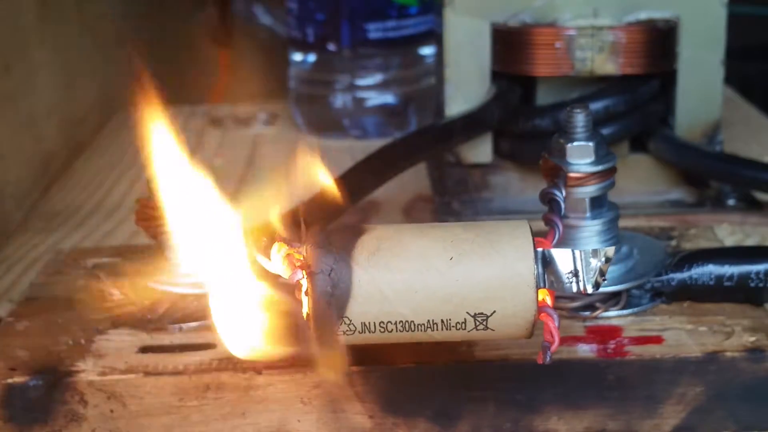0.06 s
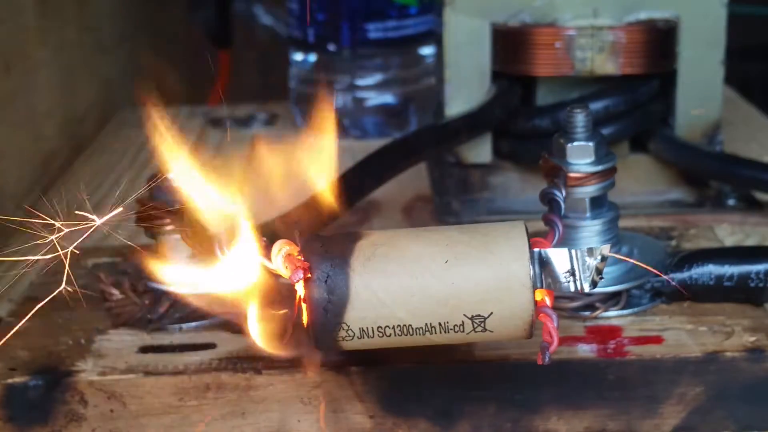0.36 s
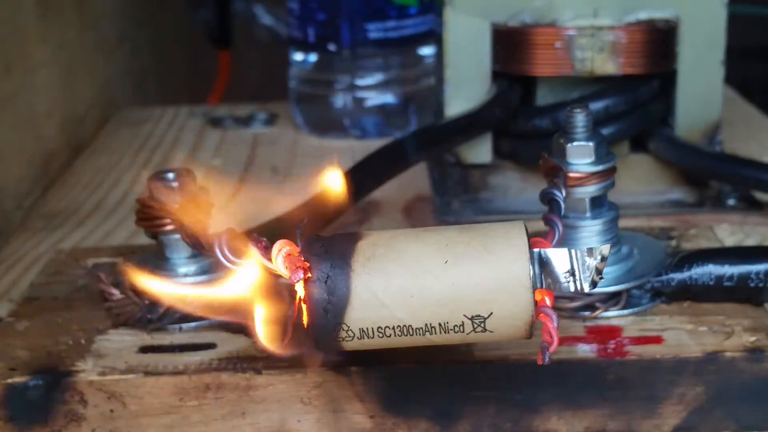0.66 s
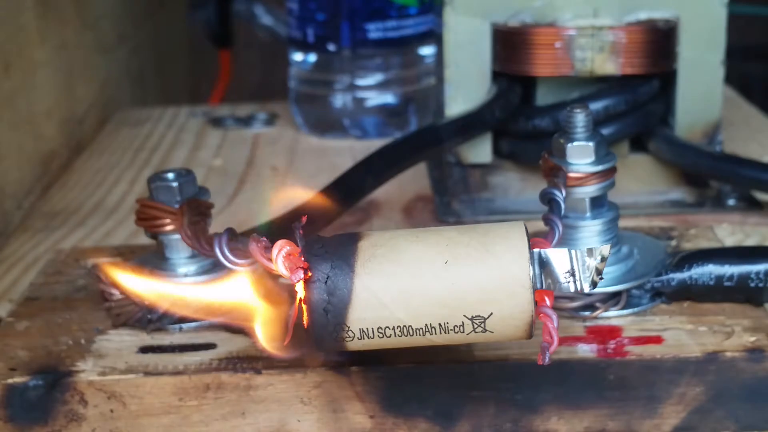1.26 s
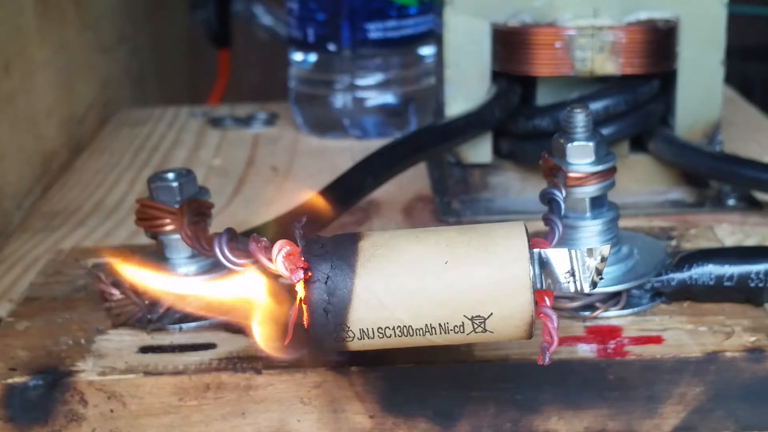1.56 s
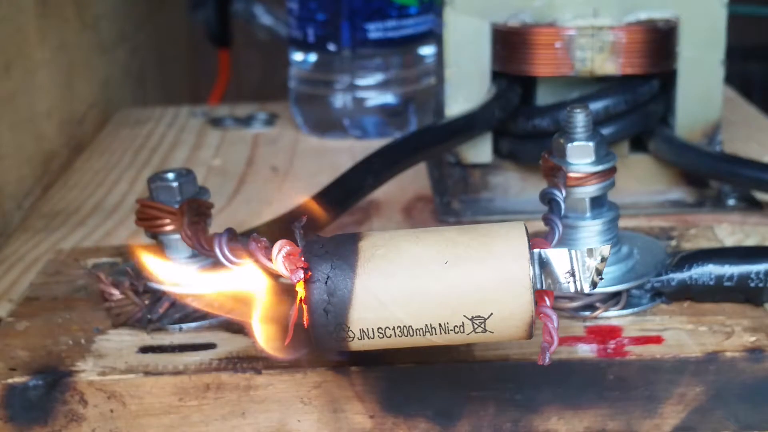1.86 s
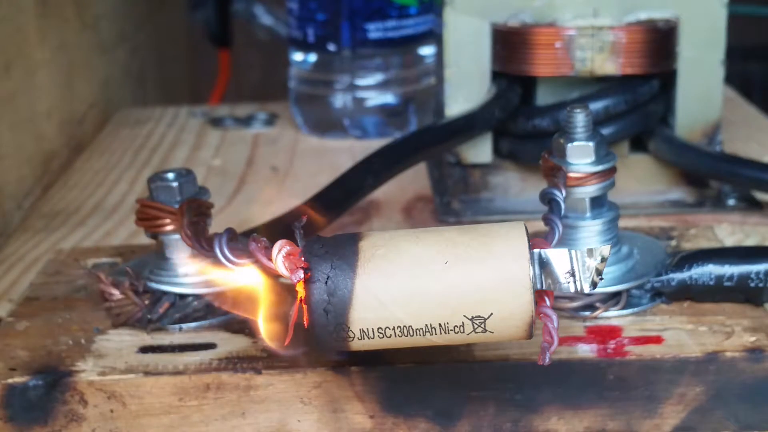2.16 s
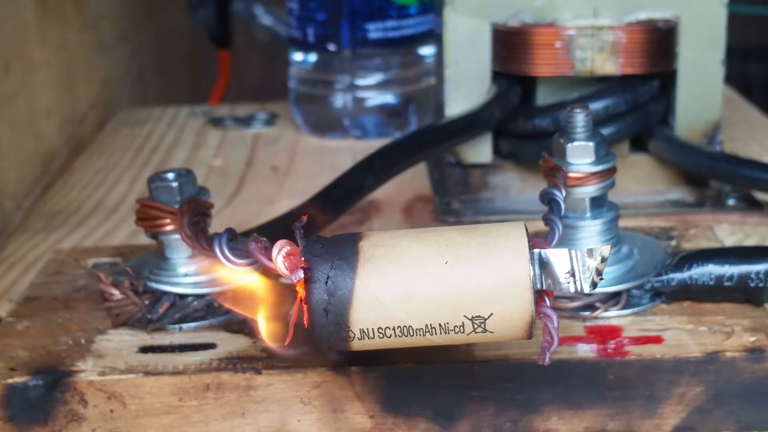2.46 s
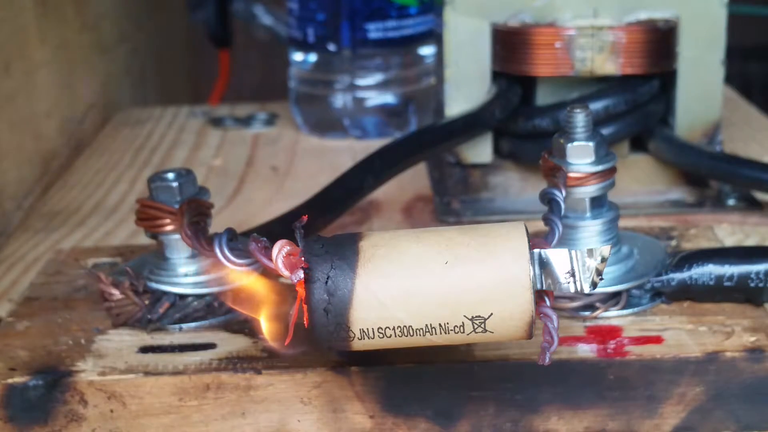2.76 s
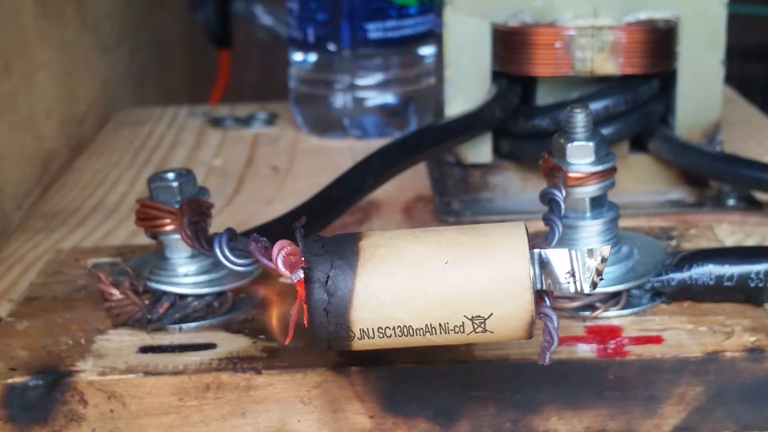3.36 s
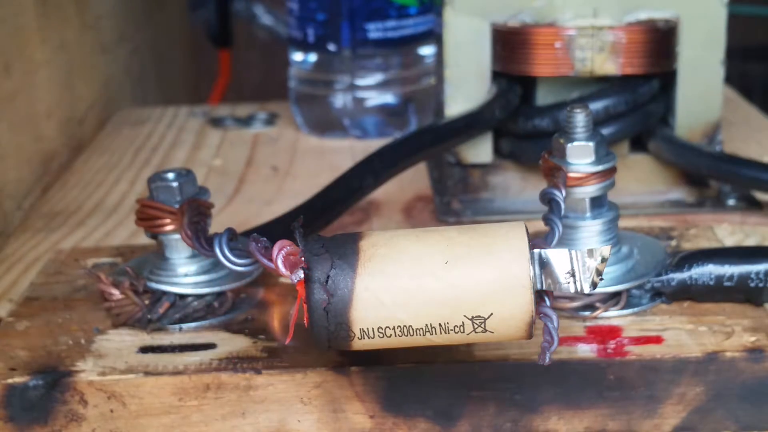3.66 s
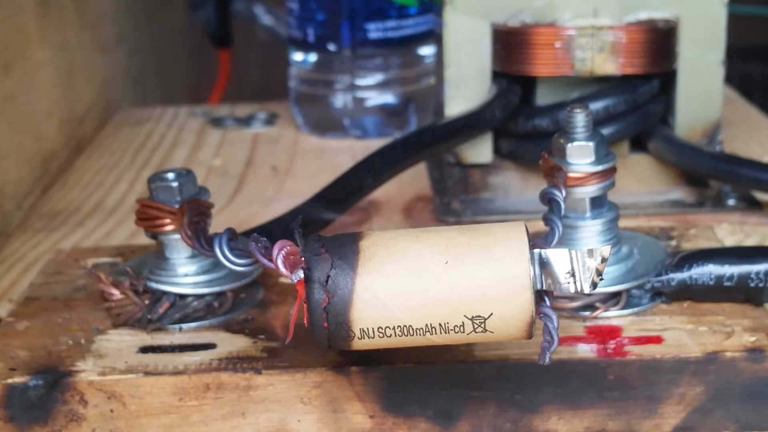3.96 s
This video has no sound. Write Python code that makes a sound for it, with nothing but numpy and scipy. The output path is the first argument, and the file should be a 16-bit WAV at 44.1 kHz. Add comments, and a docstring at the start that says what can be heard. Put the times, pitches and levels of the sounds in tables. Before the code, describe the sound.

A battery vents burning gas close by with a hissing, roaring rush and a quick burst of sharp spark pops. The hiss weakens and ends in thin, broken whistles while a power supply hums and buzzes behind it.

```python
"""Battery cell venting on a bench

A stereo pair stands close to an overcharged cell on a wooden bench. Burning gas escapes: a hissing
jet, a roaring flame, a burst of spark pops. The flame shrinks and the vent ends in thin whistles.
Behind it the power supply hums, buzzes and runs its fan. The whole level sinks around the pops,
stays low for about a second and swells back."""
import sys
import numpy as np
from scipy import signal
from scipy.fft import rfft, irfft
from scipy.io import wavfile
from scipy.ndimage import uniform_filter1d

SR = 44100
rng = np.random.default_rng(int(sys.argv[2]) if len(sys.argv) > 2 else 0)


def master(y):
    """Save y as 16-bit WAV."""
    cut = np.clip(np.atleast_2d(y).T, -1, 1)
    pcm = np.round(cut * 32767)  # scale
    wavfile.write(sys.argv[1], SR, pcm.astype(np.int16))


N = 176400
T = np.arange(N) / SR
FREQS = np.fft.rfftfreq(N, 1 / SR)
BAND_LIMIT_HZ = 15850


def amp(db):
    """Decibels to gain."""
    return 10 ** (np.asarray(db) / 20)


def unit(x):
    """Scales to rms 1."""
    return x / np.sqrt(np.mean(x ** 2) + 1e-20)


def curve(rows, column=1):
    """One column of a time table at every sample."""
    rows = np.array(rows)
    return np.interp(T, rows[:, 0], rows[:, column])


def at_hz(rows, hz, column=1):
    """One column of a spectrum table, interpolated over log frequency."""
    rows = np.array(rows)
    return np.interp(np.log(hz + 1), np.log(rows[:, 0] + 1), rows[:, column])


def pan(db):
    """Gains of constant total power, the left microphone db above the right."""
    return unit(amp(np.array([[db], [-db]]) / 2))


def wander(hz):
    """Random drift of rms 1, mostly slower than hz."""
    return unit(irfft(rfft(rng.standard_normal(N)) / (1 + (FREQS / hz) ** 2), N))


# likeness of the two microphones: f/Hz, correlation (clipped to +-1 in use)
PAIR_LIKENESS = [(70, 0.82), (300, 1.1), (650, 0.33), (1300, -0.03), (3000, 0.23), (8000, -0.55),
                 (15000, 1.2)]
# balance across the pair: f/Hz, left minus right/dB
PAIR_BALANCE = [(70, -2.5), (200, 2.5), (650, 5.5), (1300, 2.5), (15000, 6)]
def air_noise(spectrum, left_lead_s=0.000232):
    """Coloured noise at the pair: nearly mono in the bass, reaching the left microphone first."""
    shared, apart = rfft(rng.standard_normal((2, N)))
    likeness = np.clip(at_hz(PAIR_LIKENESS, FREQS), -1, 1)
    balance = amp(at_hz(PAIR_BALANCE, FREQS))
    left = shared * balance * np.exp(2j * np.pi * FREQS * left_lead_s)
    right = likeness * shared + np.sqrt(1 - likeness ** 2) * apart
    pair = np.array([left, right]) / np.sqrt(1 + balance ** 2)
    return irfft(pair * amp(at_hz(spectrum, FREQS)), N) * np.sqrt(SR)


def ring(x, colour, size=4096):
    """Rings x through a minimum-phase filter of unit energy with the given colour."""
    log_gain = np.log(amp(at_hz(colour, abs(np.fft.fftfreq(size, 1 / SR)))))
    taps = np.fft.ifft(np.exp(np.conj(signal.hilbert(log_gain)))).real[:size // 2]
    return signal.oaconvolve(x, taps[None] / np.linalg.norm(taps), axes=1)[:, :N]


# rush of the fan behind the cell: f/Hz, level/dB
FAN_AIR = [(18, -78), (35, -62), (48, -78.5), (75, -61.5), (105, -66.5), (150, -67.5), (260, -71),
           (650, -74.5), (1050, -77.5), (1600, -83.5), (2700, -86), (4500, -91), (6300, -99.5),
           (7600, -89.5), (9000, -87.5), (13000, -105), (16000, -111)]
# its drones, centred in the pair: f/Hz, waver rate/Hz, level/dB
FAN_DRONES = [(66.16, 3.7, -40.5), (84.1, 9.6, -46.5), (117, 2.8, -47)]
def fan(waver_db=1.5, drift_rad=0.79):
    """The supply's fan pushes air and adds a few unsteady low drones."""
    out = air_noise(FAN_AIR)
    for hz, waver_hz, db in FAN_DRONES:
        phase = 2 * np.pi * hz * T + drift_rad * wander(waver_hz)
        out += amp(db) * unit(np.sin(phase) * amp(waver_db * wander(waver_hz)))
    return out


PULSE_HZ = 120.009  # current pulses in the supply, two per mains cycle
# mains hum, mostly to the left: multiple of the pulse rate, level/dB, left minus right/dB
HUM_HARMONICS = [(1, -47.5, 3.5), (2, -47.5, 5.5), (4, -51, 6), (5, -57, -3), (6, -52.5, 9), (9, -51, 6.5),
                 (10, -58, 32), (11, -62.5, -30), (15, -67.5, 5), (17, -67.5, 5)]
def hum(waver_db=1, waver_hz=18):
    """The transformer hums on multiples of the current's pulse rate."""
    out = np.zeros((2, N))
    for harmonic, db, pan_db in HUM_HARMONICS:
        tone = np.sin(2 * np.pi * (harmonic * PULSE_HZ * T + rng.random()))
        out += amp(db) * unit(tone * amp(waver_db * wander(waver_hz))) * pan(pan_db)
    return out


# resonances of the buzzing supply: f/Hz, level/dB
BUZZ_COLOUR = [(1500, -29), (3200, -19.5), (3480, -5), (3840, 0.5), (4080, -4), (4350, -11), (4700, 2.5),
               (5150, -20), (5550, -1), (6400, -10), (7800, -13), (9050, -5.5), (9500, -3), (10900, -5),
               (11500, 5), (12200, -1.5), (13200, 5.5), (14500, -11.5), (15800, -7.5)]
# each tick reflected off the bench: delay/s, level/dB
BENCH_ECHOES = [(.00095, -26.5), (.0019, -9.5)]
def buzz(db=-45.5, start_s=0.0053, smear_s=0.000605, left_lag_s=0.0002693,
         rattle_db=-7.5, rattle_fall_s=0.0029):
    """Every current pulse makes the windings tick, with two short echoes and a little loose rattle."""
    hz = PULSE_HZ * np.arange(int(BAND_LIMIT_HZ / PULSE_HZ))
    tick = np.exp(-1j * np.pi * smear_s * hz ** 2 / BAND_LIMIT_HZ)  # the treble arrives last
    echoes = sum(amp(echo_db) * np.exp(-2j * np.pi * hz * delay) for delay, echo_db in BENCH_ECHOES)
    harmonics = tick * (1 + echoes)
    age = (T - start_s - np.array([[left_lag_s], [0]])) % (1 / PULSE_HZ)
    ticks = np.polyval(harmonics[::-1], np.exp(2j * np.pi * PULSE_HZ * age)).real  # sums the harmonics
    rattle = rng.standard_normal((2, N)) * np.exp(-age / rattle_fall_s)
    return amp(db) * ring(unit(ticks) + amp(rattle_db) * unit(rattle), BUZZ_COLOUR)


def whistle(rows, width_hz, pan_db, sputter_db=6, sputter_hz=22):
    """Gas sings a fuzzy, sputtering note in a narrow part of the vent; rows are t/s, f/Hz, level/dB."""
    phase = 2 * np.pi * np.cumsum(curve(rows)) / SR
    tone = [wander(width_hz) * np.cos(phase) + wander(width_hz) * np.sin(phase) for _ in range(2)]
    sounding = (T >= rows[0][0]) & (T <= rows[-1][0])
    level_db = curve(rows, column=2) + sputter_db * wander(sputter_hz)
    return np.array(tone) * sounding * amp(level_db) * pan(pan_db)


# last spurts of the vent, well to the left: t/s, length/s, f/Hz, level/dB
LAST_SPURTS = [(3.166, 0.1, 7720, -52), (3.277, 0.091, 7700, -50), (3.405, 0.069, 7600, -50),
               (3.55, .035, 7600, -54), (3.625, 0.12, 7620, -54), (3.76, .1, 7900, -53.5),
               (3.87, .05, 9000, -58)]
def spurts(fade_s=0.04, sag_hz=60, silent_db=-80):
    """The last gas escapes in broken whistles, each sagging a little in pitch."""
    out = np.zeros((2, N))
    for start, length, hz, db in LAST_SPURTS:
        high, low = hz + sag_hz / 2, hz - sag_hz / 2
        end = start + length
        rows = [(start - fade_s, high, silent_db), (start, high, db),
                (end, low, db), (end + fade_s, low, silent_db)]
        out += whistle(rows, width_hz=210, pan_db=12, sputter_db=2, sputter_hz=50)
    return out


# squeal of the vent, right of centre: t/s, f/Hz, level/dB
SQUEAL_GLIDE = [(.27, 5000, -66), (.296, 4880, -42), (.305, 4750, -36), (.318, 4650, -40), (.34, 4380, -48),
                (.37, 4200, -58)]
def squeal():
    """Escaping gas sings one short falling note among the sparks."""
    return whistle(SQUEAL_GLIDE, width_hz=350, pan_db=-5)


# puffs of the flame, just left of centre: t/s, f/Hz, level/dB
FLAME_PUFFS = [(.085, 83.4, -19), (.134, 102.2, -19), (.181, 168.2, -14.5)]
def puffs(width_s=0.0067, pan_db=2):
    """Gulps of gas catch fire, each a soft low thump."""
    out = np.zeros(N)
    for peak_s, hz, db in FLAME_PUFFS:
        swell = np.exp(-((T - peak_s) / width_s) ** 2 / 2)
        out += amp(db) * swell * np.cos(2 * np.pi * (hz * T + rng.random()))
    return out * pan(pan_db)


# size of the flame over the bench: t/s, level/dB
FLAME_SIZE = [(0, -22.5), (.05, -18), (.11, -21.5), (.195, -18), (.225, -32), (.27, -35.5), (.32, -25.5),
              (.4, -42), (.7, -33), (1.3, -32.5), (1.65, -35), (2.4, -39.5), (2.9, -42), (3.4, -46.5),
              (4, -95)]
# its roar from close by: f/Hz, level/dB
FLAME_ROAR = [(18, -25), (75, -1.5), (160, -5.5), (330, -0.5), (480, -0.5), (720, -4.5), (1000, -17.5),
              (1600, -22), (2500, -32), (5000, -38), (9000, -43)]
def flame(flicker_db=0.9, flicker_hz=25):
    """The turbulent flame roars, flickers and shrinks."""
    return unit(air_noise(FLAME_ROAR)) * amp(curve(FLAME_SIZE) + flicker_db * wander(flicker_hz))


# pops at the cell, left of centre: t/s, level/dB, length/s, body relative to crack/dB
SPARK_POPS = [(0.2317, 6.5, 0.0007, -20), (.2446, -16, .0008, -30), (.2494, 2, 0.0005, -23),
              (0.2662, -5, 0.0003, -32), (.2721, 4, 0.00032, -28), (.2743, -5, 0.00028, -32),
              (0.2805, -9, 0.00022, -35), (.2974, 4, 0.0003, -30), (.2999, -12, .0002, -35),
              (.3043, -10, .0003, -35), (0.3087, -7, 0.00027, -35), (0.3099, -9, 0.0003, -35),
              (0.3572, -11, 0.0004, -27)]
# a spark's bright crack: f/Hz, level/dB
CRACK_COLOUR = [(2800, -24.5), (6200, -15), (7700, -3), (9300, -10), (12400, -0.5), (16300, -1.5)]
# a pop's duller body: f/Hz, level/dB
BODY_COLOUR = [(2800, 2), (8000, 6), (12000, -15)]
def sparks(fall_s=0.00011, tail_s=0.0026, tail_db=-11.5, pan_db=5,
           swarm_at_s=0.3, swarm_width_s=0.03, peak_per_s=820, fine_db=-16):
    """Each spark is a tiny burst with a short tail off the bench; finer ones crackle between."""
    swarm = np.exp(-((T - swarm_at_s) / swarm_width_s) ** 2 / 2)
    fine = (rng.random(N) < swarm * peak_per_s / SR) * rng.standard_normal(N) * amp(fine_db)
    crack_power, body_power = np.zeros((2, N))
    for start, db, length, body_db in SPARK_POPS:
        age = np.maximum(T - start, 0)
        burst = np.exp(-np.maximum(age - length, 0) / fall_s)
        tail = amp(tail_db) * np.exp(-age / tail_s)
        pop = (T >= start) * amp(db) * (burst + tail)
        crack_power += pop ** 2
        body_power += (amp(body_db) * pop) ** 2
    grit = rng.choice([-1, 1], (2, N))
    crack = ring(np.sqrt(crack_power) * grit + fine, CRACK_COLOUR)
    body = ring(np.sqrt(body_power) * grit, BODY_COLOUR)
    return (crack + body) * pan(pan_db)


# strength of the gas jet at the cell: t/s, level/dB
JET_STRENGTH = [(0, -24), (.2, -19.5), (.224, -28.5), (.29, -27.5), (.31, -22.5), (.39, -37), (.53, -34.5),
                (1.22, -34), (1.37, -38.5), (1.64, -37.5), (1.7, -36.5), (2.2, -40), (2.33, -48), (4, -52)]
# its hiss at each microphone: f/Hz, left level/dB, right level/dB
JET_HISS = [(1200, -38, -40), (6500, -21.5, -18), (7710, -2.5, -21), (7940, -1.5, -20), (8450, -9.5, -21.5),
            (10250, -7.5, -3.5), (11640, -4.5, 3.5), (13000, -2, -7.5), (16300, -9.5, -13)]
# its rasp at full pressure: f/Hz, level/dB
JET_RASP = [(500, -17), (1300, 8.5), (2300, 1), (4000, 1), (5200, -16.5), (7800, 6.5), (11000, 11),
            (15800, 7.5)]
# shrill resonance of the split seal, to the left: t/s, level/dB
SEAL_SHRILL = [(0, -47), (.1, -29), (.14, -17), (.2, -26), (.225, -39), (.9, -38.5), (1.6, -33),
               (1.69, -39), (2.2, -53), (2.33, -70)]
def jet(full_db=-18, rasp_db=-16.5, rasp_slope=1.8, shrill_hz=12920,
        flutter_db=0.47, flutter_hz=40, spit_db=1.5, spit_hz=500):
    """Gas hisses through the split seal, fluttering and spitting; high pressure adds a broad rasp."""
    strength_db = curve(JET_STRENGTH)
    colour = amp([at_hz(JET_HISS, FREQS, column) for column in (1, 2)])
    hiss = unit(irfft(rfft(rng.standard_normal((2, N))) * colour, N)) * amp(strength_db)
    rasp = unit(air_noise(JET_RASP)) * amp(rasp_db + rasp_slope * (strength_db - full_db))
    shrill_rows = [(t, shrill_hz, db) for t, db in SEAL_SHRILL]
    shrill = whistle(shrill_rows, width_hz=910, pan_db=8, sputter_db=1.3, sputter_hz=20)
    return (hiss + rasp + shrill) * amp(flutter_db * wander(flutter_hz) + spit_db * wander(spit_hz))


def scene():
    """At the pair: the burning cell in front, its power supply behind."""
    cell = squeal() + spurts() + jet() + flame() + puffs() + sparks()
    supply = fan() + hum() + buzz()
    return cell + supply


# dip and return of the whole level, both channels alike: t/s, level/dB
LEVEL_DIP = [(0, -6.5), (.23, -15), (.45, -12), (.7, -18), (1.02, -19), (1.25, -15), (1.42, -9.5),
             (1.62, -4), (1.95, -.5), (2.4, 0.5), (4, 0.5)]
def record(dry, size=512, threshold_db=-88.5, gate_slope=0.65, max_cut_db=12):
    """The level dips and returns; a gate lowers the faintest bands; a low-pass trims the top treble."""
    bands = signal.stft(dry * amp(curve(LEVEL_DIP)), SR, nperseg=size, scaling="psd")[2]
    density = 2 * (abs(bands) ** 2).mean(0)  # power per Hz
    density = uniform_filter1d(density, size=7, axis=0)  # smoothed over frequency
    density = uniform_filter1d(density, size=5, axis=1)  # and over time
    below_db = threshold_db - 10 * np.log10(abs(density) + 1e-20)
    cut_db = np.clip(below_db * gate_slope, 0, max_cut_db)
    gated = signal.istft(bands * amp(-cut_db), SR, nperseg=size, scaling="psd")[1][:, :N]
    lowpass = signal.firwin(301, BAND_LIMIT_HZ, window=("kaiser", 8), fs=SR)
    return signal.oaconvolve(gated, lowpass[None], "same")


dry = scene()
out = record(dry)
master(out)
```